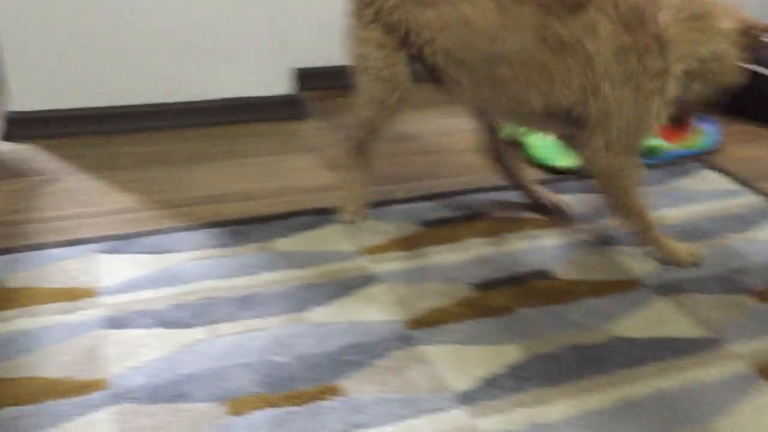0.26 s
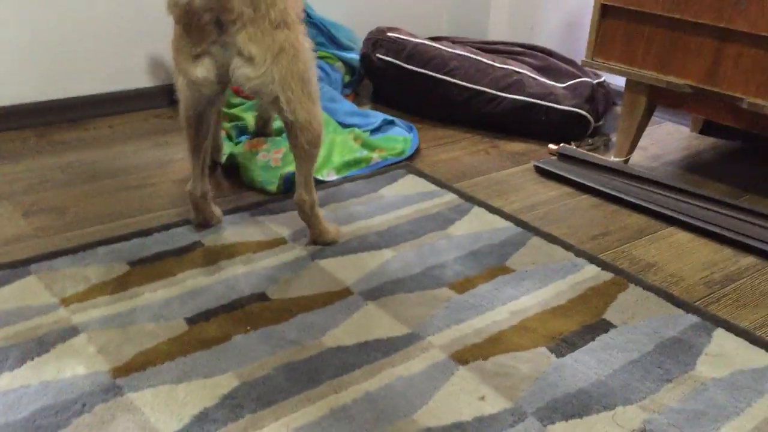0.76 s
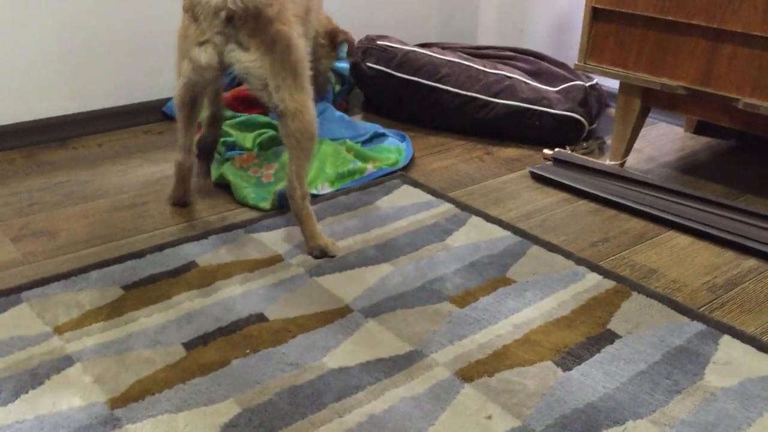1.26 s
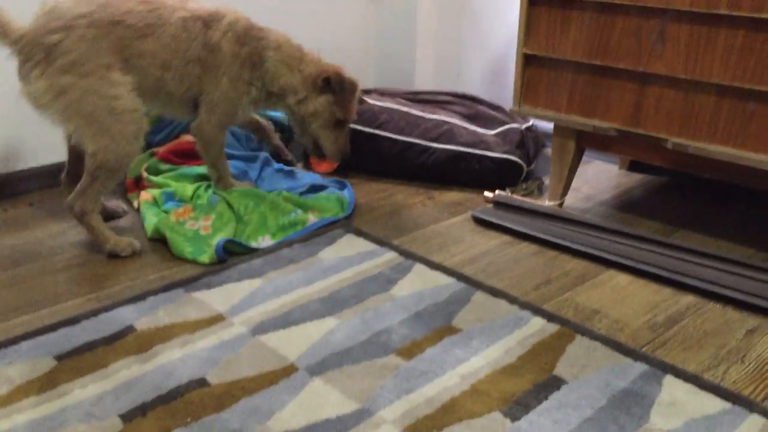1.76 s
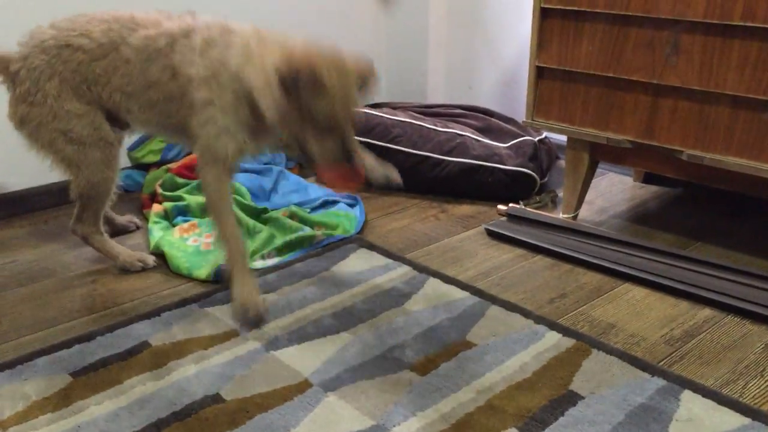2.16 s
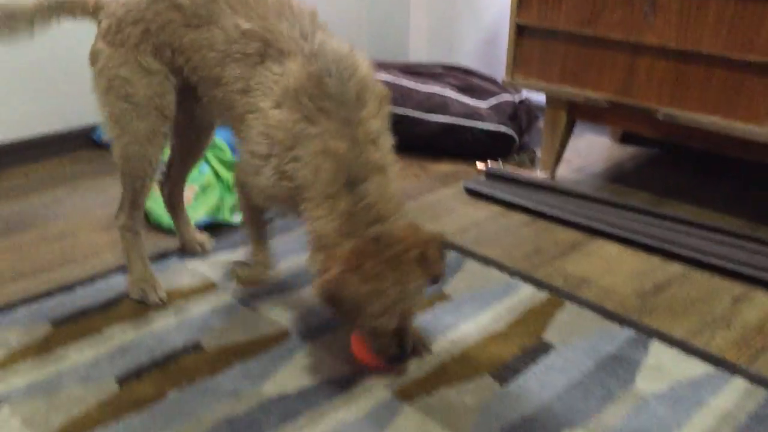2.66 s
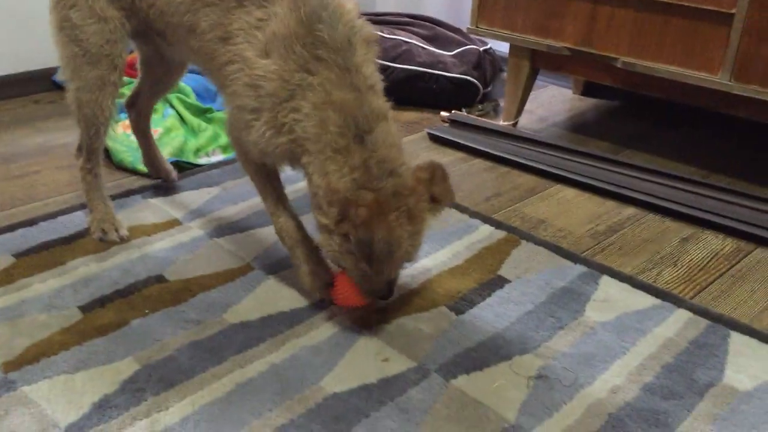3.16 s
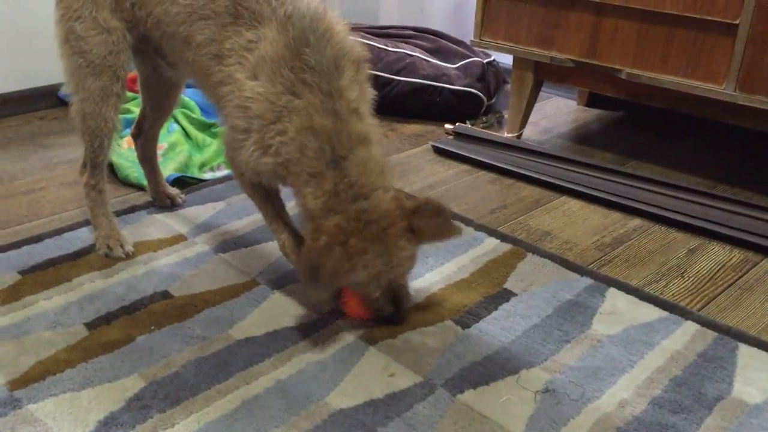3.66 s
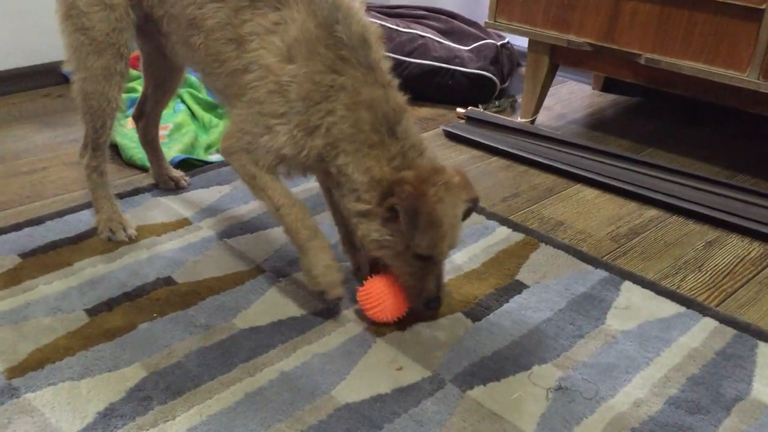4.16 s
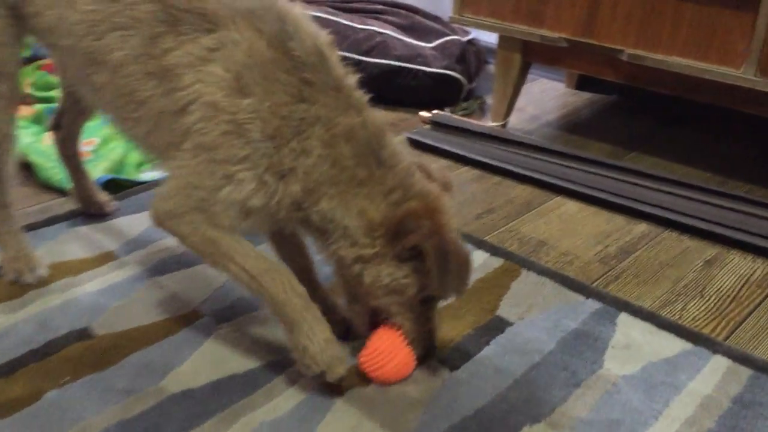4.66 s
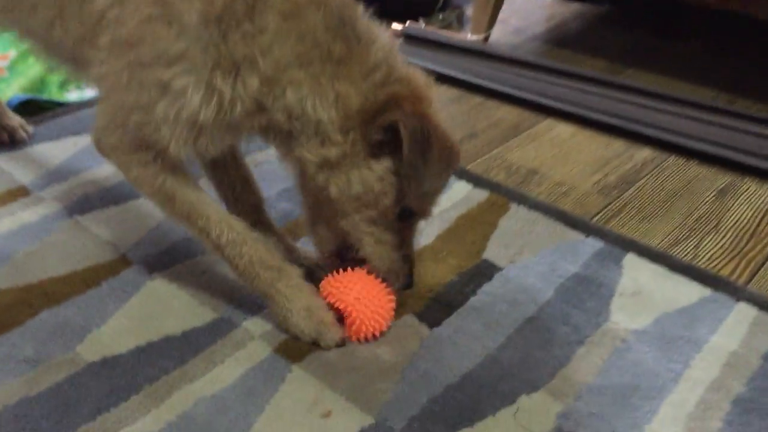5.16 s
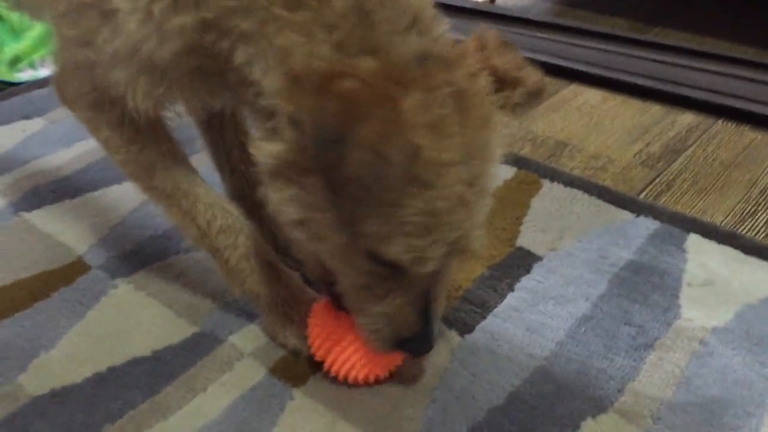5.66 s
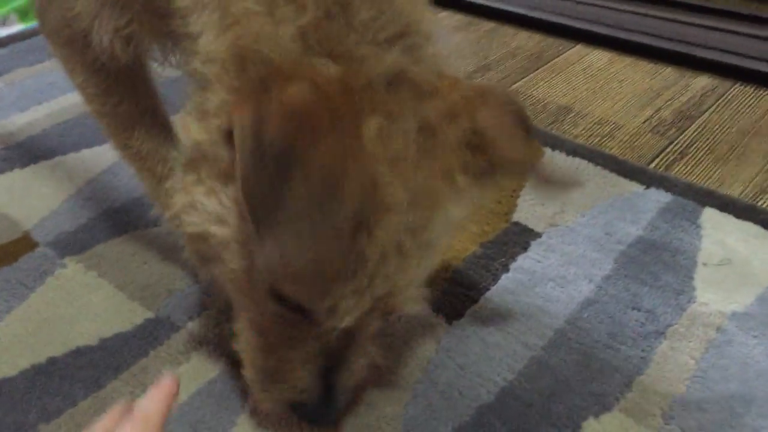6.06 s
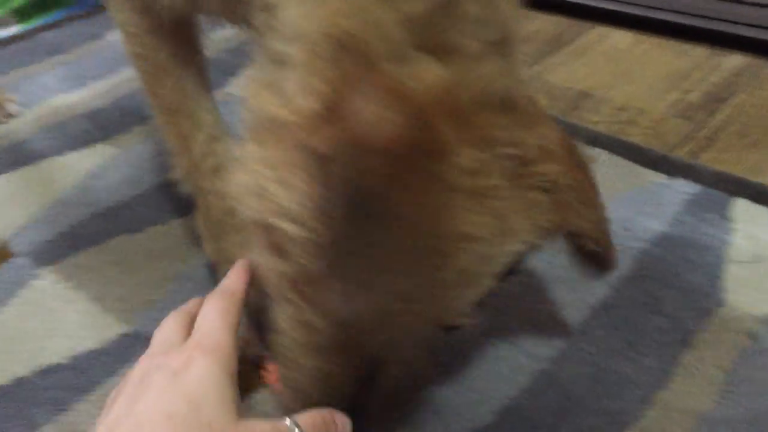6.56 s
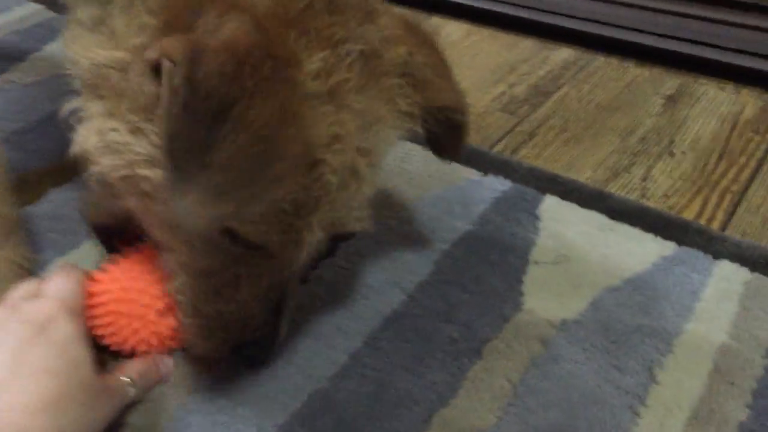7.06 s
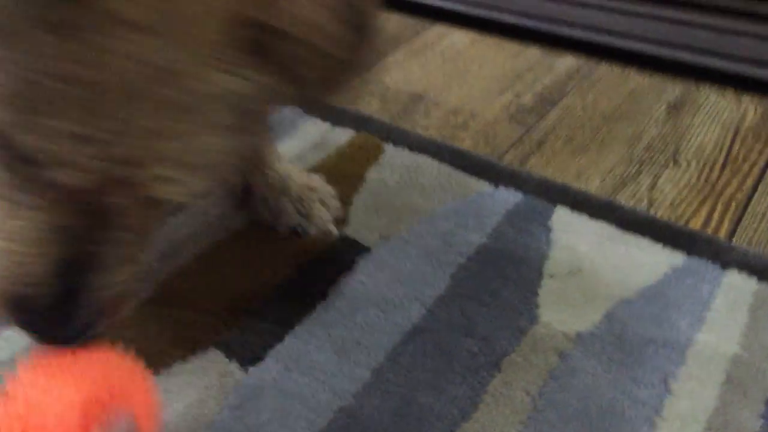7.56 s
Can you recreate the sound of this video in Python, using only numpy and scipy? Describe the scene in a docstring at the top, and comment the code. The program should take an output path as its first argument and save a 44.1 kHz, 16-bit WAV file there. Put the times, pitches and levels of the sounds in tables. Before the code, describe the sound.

A dog plays with a hollow rubber squeaky ball in a small, lively room. Brief, bright reedy squeaks come one per bite, with a sharp squeal early on, sparser chirps, then a dense run of chewing. After a near pause, louder, closer squeaks return with a hard click and a second squeal. Soft paw thuds, dull jaw knocks and faint fur rustle sit over very quiet room noise.

```python
"""A spiky rubber ball squeaks as a dog chews it on a rug in a living room, first farther off, then close by.
Each bite drives air through the ball's reed: the squeak scoops up, usually sags as the ball empties, and drops
as the jaw lets go. A clamping jaw pushes the pitch up, as far as a squeal; weak air only hisses. Paws thud as
low booms, jaws knock on the hollow rubber, and uneven soft noises swell and fade near the dog. The small room
answers every sound of the dog with echoes, over a faint steady noise."""
import sys
import numpy as np
from scipy import signal
from scipy.fft import rfft, irfft
from scipy.io import wavfile
from scipy.ndimage import uniform_filter1d

SR = 44100
rng = np.random.default_rng(int(sys.argv[2]) if len(sys.argv) > 2 else 0)


def put_to_file(sound):
    """Save the sound as 16-bit audio at rate SR, in the file named by the first command-line argument."""
    columns = np.atleast_2d(sound).T  # one column per channel
    safe = np.clip(columns, -1, 1)
    whole_steps = np.round(safe * 32767)
    wavfile.write(sys.argv[1], SR, whole_steps.astype(np.int16))


N = 344862

# The tone colour of the quiet room. Each row: frequency in Hz, relative level per Hz in dB.
QUIET_ROOM_COLOUR = [(30, -9), (60, 6.5), (110, 0), (200, 1), (500, -7.5), (900, -12), (1400, -12),
                     (2000, -12), (4000, -19.5), (6500, -22), (15000, -25.5)]
# How the room echoes. Each row: frequency in Hz, time to fade by 60 dB in seconds, relative level in dB.
ROOM_BANDS = [(100, 0.65, 5.5), (440, 0.29, 0), (1080, 0.51, 9), (2200, 0.57, 4.5), (4060, 0.49, 8),
              (7400, 0.48, 5), (14000, 0.47, 1)]
# The dog comes nearer. Each row: time in seconds, room sound minus direct sound in dB.
ROOM_SHARE = [(0, -9.5), (.5, -9.5), (.9, -6.5), (1.6, -7), (2.3, -9), (2.7, -10), (3.5, -10), (4.2, -10),
              (4.9, -14), (6.2, -17.5), (6.7, -16), (7.8, -18)]
# Uneven soft noises near the dog swell and fade. Each row: start in seconds, length in seconds, level in dB.
SOFT_NOISES = [(1.95, 0.11, -66), (2.697, 0.11, -55.5), (7.498, 0.19, -54), (7.692, 0.09, -50.5)]
# The tone colour of the soft noises. Each row: frequency in Hz, relative level in dB.
SOFT_NOISE_COLOUR = [(150, -17), (330, -1.5), (550, -15), (850, -7), (1600, -5), (2400, -6), (3600, -25),
                     (6000, -16.5), (15000, -35)]
# Paws on floor and rug. Each row: start in seconds, level in dB, pitch in Hz,
# time to fade by 60 dB in seconds.
PAW_THUDS = [(.156, -38, 60.4, .19), (.371, -23, 73.5, 0.053), (.38, -42, 237, 0.11),
             (.43, -36.5, 59.6, 0.12), (.721, -37.5, 74, 0.092), (.795, -33, 136, 0.085),
             (1.247, -37, 225, 0.085), (1.868, -38.5, 162, 0.082), (2.29, -35.5, 60.7, .17),
             (2.358, -47, 60, .13), (2.66, -38.5, 84.8, .069), (5.825, -43.5, 102.5, 0.068),
             (6.491, -43, 167, 0.11), (6.887, -36.5, 122, 0.038), (7.035, -28.5, 146, .039),
             (7.34, -39.5, 67.3, 0.15), (7.78, -38.5, 202, 0.22)]
# Teeth and claws knock on ball and floor. Each row: time in seconds, level in dB, extra treble in dB.
KNOCKS = [(.795, -36, -4), (1.248, -48, 12.5), (1.867, -43.5, 24), (2.756, -52.5, 0.5), (2.979, -50, 13),
          (3.173, -53, -0.5), (3.269, -51.5, 6), (5.159, -50, 17.5), (5.192, -50, -1), (5.215, -47, -0.5),
          (5.404, -49.5, -0.5), (5.482, -50.5, 6.5), (5.493, -45, 9), (5.577, -54, -6.5), (5.81, -48, 1),
          (5.827, -48, 14.5), (5.863, -54.5, 4.5), (5.977, -42, 24.5), (6.477, -47, -8), (6.551, -24, 25),
          (6.614, -48, -7.5), (7.042, -48, -12), (7.235, -48.5, -5.5), (7.363, -51.5, 3),
          (7.553, -46.5, 8.5), (7.78, -44, -3.5), (7.799, -46, 8)]
# The ways the hollow ball rings. Each row: pitch in Hz, relative level in dB,
# time to fade by 60 dB in seconds.
BALL_MODES = [(191, -0.5, 0.15), (296.2, 5, .07), (382.3, -3, 0.1), (551, -1.5, 0.059), (786, 1.5, 0.039),
              (1110, -5, 0.062)]
# Air too weak to make the reed beat. Each row: start in seconds, length in seconds, level in dB.
PUFFS = [(1.356, 0.01, -44), (1.98, 0.039, -58), (2.716, 0.027, -62), (3.195, .14, -75),
         (5.187, 0.039, -63.5), (5.296, 0.041, -66.5), (5.443, 0.043, -52.5), (5.686, 0.11, -66),
         (5.984, 0.027, -56.5), (7.056, 0.021, -44.5), (7.242, .065, -45.5), (7.363, 0.031, -45),
         (7.461, 0.052, -48)]
# The tone colour of air hissing through the reed. Each row: frequency in Hz, relative level in dB.
HISS_COLOUR = [(1000, -13.5), (3800, -25), (5200, -11), (6300, -0.5), (7000, 0), (7800, -14), (9200, -7.5),
               (10300, -15.5), (12000, -14), (15000, -17)]
# The reed barely swings and hums. Each row: start in seconds, length in seconds, level in dB, pitch in Hz.
HUMS = [(0.123, 0.058, -52.5, 793), (1.262, 0.022, -46.5, 895), (3.041, 0.035, -55.5, 806),
        (7.255, 0.039, -52.5, 855), (7.374, 0.013, -54.5, 798)]
# The reed in its short pipe favours some frequencies. Each row: frequency in Hz, relative level in dB.
PIPE_COLOUR = [(700, 13), (1000, -5), (2000, 0), (2950, -12.5), (3900, -21.5), (4700, -20.5), (5600, -16),
               (6500, -10), (7600, -15.5), (8700, -14.5), (10300, -24.5), (11500, -25), (14500, -22.5),
               (16000, -29.5)]
# A hard squeeze makes the reed beat unevenly, until it overblows into a whistle.
# Each row: pitch in Hz, strain from 0 to 1.
STRAIN_BY_PITCH = [(950, .04), (1100, .16), (1500, .55), (2500, .9), (4000, .4)]
# One squeak a bite. Each row: start in seconds, length in seconds, rise in seconds,
# pitch in Hz before the bends, sag in Hz per second, level in dB before the swells, brightness in dB,
# then the colour from the muzzle: dB at 2 kHz, at 3 kHz, at 4 kHz, and from 8 kHz up.
BITES = [ (-.01, 0.061, .005, 1032, 400, -31, -5, -15, 19, 13, -6.5),
         (0.224, .1, 0.00091, 1033, 95, -32.5, -4, -5.5, 10, 18.5, -3.5),
         (.393, 0.05, 0.0026, 1021, 1897, -32.5, -10.5, 1, 16.5, 7, -3.5),
         (0.511, 0.041, 0.0011, 963, 169, -35, -14, -2, 9.5, 2.5, 3),
         (0.681, 0.042, 0.0011, 988, -250, -32.5, -7.5, -1.5, 5.5, 12, 6.5),
         (0.931, .115, 0.0022, 1131, 1395.5, -31.5, -4.5, -1, 6, 15.5, 3),
         (1.155, 0.063, 0.00088, 991, -300, -36, -8, 4, 14, 18.5, 3.5),
         (1.227, 0.032, 0.0023, 996, 2, -38.5, -2.5, 3, 6, 11, 0),
         (1.4, 0.01, 0.0014, 1006, -5, -39, -8.5, -2.5, 0, 6, 0),
         (1.623, 0.076, 0.0022, 1014, 182, -38.5, -7.5, -0.5, -0.5, 4, -2),
         (2.125, 0.014, 0.0021, 915, -0.5, -38.5, -11.5, 2, 4, -3, -1),
         (2.203, 0.05, 0.0014, 963, 425, -35, -5, 4, 2, 4, 4),
         (2.416, .011, 0.0017, 899, 0, -47, -10, 13.5, 10, -8, 1.5),
         (2.574, .11, 0.00071, 970, 734, -36.5, -3, 0, 5.5, 7, -1.5),
         (3.386, 0.09, 0.00092, 1016, 657, -30, -20.5, -3.5, -1.5, -4.5, -3.5),
         (3.495, 0.084, .003, 1155, 1850, -28, -12, 0.5, -0.5, 5, -12),
         (3.684, .054, 0.013, 1110, 1940, -29, -21.5, -2.5, -4, -5, -3),
         (3.785, 0.17, 0.0066, 1103, 505, -28.5, -11, 1, 5.5, 4, -12.5),
         (4.023, 0.053, 0.00059, 1023, 1329, -28, -21, -1, -3, -7, -2),
         (4.218, 0.073, 0.0076, 1064, 1030, -28, -13.5, -2, -4, -6.5, 12.5),
         (4.412, 0.12, 0.0031, 1027, 820, -29, -8, -3.5, -7, -8, 11.5),
         (4.645, 0.11, 0.0045, 1145, 1206, -26.5, -11.5, 2, 0, -0.5, 0.5),
         (4.807, 0.14, 0.0011, 984, 83, -29, -16.5, -3, -4, -4.5, 10.5),
         (6.013, 0.1087, 0.023, 1038, 1114, -26.5, -7.5, 1, -6, -5, -5.5),
         (6.166, 0.16, 0.0057, 1104, 479, -24.5, 5.5, -10, -2.5, 3.5, -11),
         (6.451, 0.081, 0.00071, 969, -3, -27.5, -8.5, -3.5, 0.5, -1.5, -4),
         (6.763, 0.099, 0.002, 1009, 450, -24.5, -12, -12, 2.5, -9, -4),
         (6.972, 0.048, 0.0078, 1021, 3091, -26.5, -7.5, -19.5, 4.5, -9, -0.5),
         (7.641, 0.053, 0.0028, 951, 1250, -25, -7, 11, 11.5, 6.5, -3.5)]
# The jaw clamps down within a bite. Each row: time in seconds, half width in seconds,
# pitch rise in Hz, level rise in dB.
CLAMPS = [(.002, 0.023, 548, 12), (.2386, 0.031, 214.7, 11.5), (3.801, 0.03, 244.6, 3),
          (4.713, 0.012, 45.2, 5), (6.202, .042, 536.6, 9), (6.781, 0.019, 30.3, 0.5)]
# Twice the ball is crushed flat and the reed overblows; each squeal is a list of points.
# Each row of a list: time in seconds, reed pitch in Hz, level in dB.
SQUEALS = [
    [(.768, 1109, -25.5), (.793, 1385, -21), (.809, 1928, -28), (.823, 2760, -16), (.847, 3946, -27.5),
     (.886, 4186, -33.5), (.896, 3415, -26.5), (.9, 2843, -14), (.911, 1670, -28.5), (.925, 1226, -38)],
    [(6.564, 1365, -20), (6.576, 1534, -19.5), (6.6, 1550, -25), (6.612, 2080, -18), (6.624, 2620, -21.5),
     (6.63, 2140, -29)],
]
# The colour of each squeal. Each row: brightness in dB, then dB at 2 kHz, at 3 kHz, at 4 kHz,
# and from 8 kHz up.
SQUEAL_COLOURS = [(-4.5, -1, 13.5, 15, -5), (-3.5, -6, 6.1, 3.3, -13.5)]

# level of the quiet room, and the highest frequency let through
QUIET_ROOM_DB, TOP_HZ = -69, 15600
# the dog stands over the ball and gnaws it
GNAW_START_S, GNAW_END_S = 3.6, 6.8
# the jaws meet the ball just before each squeak; their level is relative to the squeak
JAW_LEAD_S, JAW_DB, JAW_TREBLE_DB = 0.014, -27, 5
# pitch scatter (as a share) and level scatter at full strain; the jaw's tremble as a share of the pitch
RASP_JITTER, RASP_DB, TREMOR = .011, 3, .005
# shares of the pitch by which a squeak starts flat and ends flat, and the time the jaw takes to let go
SCOOP, DROP, LET_GO_S = 0.068, .07, .0024
# a slow bite starts flatter still, and lets go more slowly by a share of its rise
SCOOP_PER_RISE_S, LET_GO_SHARE = 8, 0.41
# a bite with this rise swells in from so many dB below; quick ones start near full strength
SLOW_RISE_S, SWELL_DB = 0.02, 15.5
# as the pressure falls, the squeak gets softer and duller with its pitch
LEVEL_DB_PER_OCTAVE, BRIGHT_DB_PER_OCTAVE = 38, 9.5
CLAMP_FLATNESS = 2.4  # 2 is a bell shape; more holds the top longer


def undb(db):
    """Turn decibels into a gain."""
    return 10 ** (np.asarray(db) / 20)


def unit(x):
    """Scale a sound to an average (rms) strength of 1."""
    return x / np.sqrt(np.mean(x ** 2) + 1e-18)


def lookup(hz, points):
    """Read a value between (Hz, value) points, with frequency on a log scale."""
    point_hz, value = np.transpose(points)
    return np.interp(np.log(np.maximum(hz, 1)), np.log(point_hz), value)


def noise(size, colour):
    """Make noise of rms 1 with the given (Hz, dB) colour."""
    hz = np.fft.rfftfreq(size, 1 / SR)
    white = rfft(rng.standard_normal(size))
    return unit(irfft(white * undb(lookup(hz, colour)), size))


def wander(t, rate):
    """Drift between random values, with `rate` new values a second and a spread near 1."""
    knots = rng.standard_normal(int(t[-1] * rate) + 2)
    return np.interp(t * rate, np.arange(len(knots)), knots)


def clock(length):
    """List the sample times of a short sound."""
    return np.arange(max(int(length * SR), 2)) / SR


def decay(t, t60):
    """Fade by 60 dB in t60 seconds."""
    return np.exp(-np.log(1000) * t / t60)


def gate(t, length, edge):
    """Swell up from 0, and fade from `length` on, over rounded edges."""
    nearest_end = np.minimum(t, length + edge - t)
    return np.sin(np.pi / 2 * np.clip(nearest_end / edge, 0, 1)) ** 2


def rounded(t, s, values, span):
    """Draw a curve through the points, its corners rounded by the give of the rubber."""
    curve = np.interp(t, s, values)
    return uniform_filter1d(curve, max(int(span * SR), 1), mode="nearest")


def add(track, start, sound):
    """Mix a sound into the track at a time in seconds, leaving out what falls outside."""
    i = int(start * SR)
    sound, i = sound[max(-i, 0):], max(i, 0)
    track[i:i + len(sound)] += sound[:max(N - i, 0)]


def quiet_room(t):
    """The room's own faint noise, whose level drifts a little."""
    return noise(N, QUIET_ROOM_COLOUR) * undb(QUIET_ROOM_DB + 0.42 * wander(t, 4.4))


def room(x, first=0.0065, early_db=4, early_t60=0.11, dense=.06):
    """Floor and furniture answer with single echoes, which crowd into a tail; each band fades at its own rate."""
    t = clock(.8)
    hz = np.fft.rfftfreq(len(t), 1 / SR)
    centres, t60s, colours = np.transpose(ROOM_BANDS)
    # echoes grow in number with the square of the time, between a floor and a ceiling
    density = np.clip(.1 * (t / dense) ** 2, .02, 1)
    signs = np.sign(rng.standard_normal(len(t)))
    present = rng.random(len(t)) < density
    echoes = rfft(signs * present / np.sqrt(density))
    onset = (t > first) * (1 + undb(early_db) * decay(t, early_t60))
    response = 0
    for band, t60, db in zip(np.eye(len(ROOM_BANDS)), t60s, colours):
        shape = onset * decay(t, t60)
        weight = lookup(hz, np.column_stack([centres, band]))
        band_echoes = irfft(echoes * weight, len(t))
        response = response + undb(db) * band_echoes * shape / np.linalg.norm(shape)
    return signal.fftconvolve(x, response)[:N]


def soft_noises(grain_db=5.0):
    """An uneven soft noise that swells and fades."""
    out = np.zeros(N)
    for s, length, db in SOFT_NOISES:
        t = clock(length + .07)
        level = undb(db + grain_db * wander(t, 176))
        add(out, s - .035, noise(len(t), SOFT_NOISE_COLOUR) * gate(t, length, edge=0.08) * level)
    return out


def paws(rise=0.0037, scuff_db=-12, count=12, shift_db=-57, low_hz=55, high_hz=170, shift_t60=0.2):
    """Soft pads push the floor: a damped boom with a little scuff. The gnawing dog shifts its weight."""
    out, t = np.zeros(N), clock(.2)
    scuff_colour = [(25, -4), (60, -5), (250, -0.5), (600, -14.5), (3000, -32)]
    shifts = []
    for when, pitch in rng.random((count, 2)):
        start = np.interp(when, [0, 1], [GNAW_START_S, GNAW_END_S])
        shifts.append((start, shift_db, low_hz * (high_hz / low_hz) ** pitch, shift_t60))
    for s, db, hz, t60 in [*PAW_THUDS, *shifts]:
        boom = unit(np.sin(2 * np.pi * hz * t)) * decay(t, t60)
        scuff = noise(len(t), scuff_colour) * decay(t, t60)
        add(out, s, undb(db) * (boom + undb(scuff_db) * scuff) * (1 - np.exp(-t / rise)))
    return out


def knock(treble_db, tick_db=-8, tick_t60=0.03, rise=0.00025, rub_db=-12, rub_t60=0.42, tilt=0.94):
    """A tooth slips on the rubber: a tick, a rub, and dull ringing whose pitches shift as the ball is squashed."""
    t = clock(.3)
    hz, db, t60 = np.transpose(BALL_MODES)[:, :, None]
    level_chance, pitch_chance = rng.standard_normal((2, len(BALL_MODES), 1))
    # harder contact favours the higher modes
    size = undb(db + tilt * treble_db * np.log2(hz / hz[0]) + 2 * level_chance)
    modes = np.sin(2 * np.pi * hz * (1 + 0.091 * pitch_chance) * t) * decay(t, t60)
    body = (size * modes).sum(0) / np.linalg.norm(size)
    tick_colour = [(300, -9), (1000, -25.5), (2400, -1), (4000, -25.0), (7000, -16), (15000, -40)]
    tick = noise(len(t), tick_colour) * decay(t, tick_t60)
    rub_colour = [(100, -5.5), (330, 2.5), (550, -6.5), (1000, -2.5), (1600, -16.5), (5000, -29.0)]
    rub = noise(len(t), rub_colour) * decay(t, rub_t60)
    hard = undb(tick_db + treble_db)
    mix = 2.76 * body + hard * tick + undb(rub_db) * rub
    return mix * (1 - np.exp(-t / rise)) / np.hypot(1, hard)


def chewing(count=12, faint_db=-58, spread_db=6):
    """Clear knocks, the jaws closing before each squeak, and faint gnawing at random moments."""
    out = np.zeros(N)
    for s, db, treble_db in KNOCKS:
        add(out, s - .002, undb(db) * knock(treble_db))
    for s, length, rise, hz, sag, db, *colour in BITES:
        add(out, s - JAW_LEAD_S, undb(db + JAW_DB) * knock(JAW_TREBLE_DB))
    for when, size, treble in rng.random((count, 3)):
        start = np.interp(when, [0, 1], [GNAW_START_S, GNAW_END_S])
        add(out, start, undb(faint_db + spread_db * size) * knock(4 * treble))
    return out


def puffs():
    """Air too weak to make the reed beat only hisses through it."""
    out = np.zeros(N)
    for s, length, db in PUFFS:
        t = clock(length + 0.0076)
        level = undb(db + 1.0 * wander(t, 88))
        add(out, s - .004, noise(len(t), HISS_COLOUR) * gate(t, length, edge=0.0061) * level)
    return out


def hums():
    """A reed that barely swings gives a nearly pure, slightly unsteady tone."""
    out = np.zeros(N)
    for s, length, db, hz in HUMS:
        t = clock(length + 0.013)
        unsteady_hz = hz * (1 + 0.0086 * wander(t, 80))
        tone = np.sin(2 * np.pi * np.cumsum(unsteady_hz) / SR)
        add(out, s - .005, unit(tone) * gate(t, length, edge=0.013) * undb(db))
    return out


def bite(start, length, rise, top_hz, sag, db, bright_db):
    """One bite as rows of seconds, Hz, dB, brightness dB: pressure builds, leaks away and is let go."""
    t = clock(length)
    building = np.exp(-t / rise)
    letting_go = np.exp((t - length) / (LET_GO_S + LET_GO_SHARE * rise))
    held_hz = (top_hz - sag * t) * (1 - DROP * letting_go)
    hz = held_hz * (1 - (SCOOP + SCOOP_PER_RISE_S * rise) * building)
    octaves = np.minimum(np.log2(held_hz / hz.max()), 0)  # how far the pitch has fallen
    swell = SWELL_DB * (building * rise / SLOW_RISE_S) ** 2
    db = db + LEVEL_DB_PER_OCTAVE * octaves - swell
    for s, width, more_hz, more_db in CLAMPS:
        clamp = np.exp(-np.abs((start + t - s) / width) ** CLAMP_FLATNESS)
        hz = hz + more_hz * clamp
        db = db + more_db * np.sqrt(clamp)
    return np.column_stack([start + t, hz, db, bright_db + BRIGHT_DB_PER_OCTAVE * octaves])


def harmonics(t, hz, bright_db, muzzle, sway_db=2.18):
    """Size the reed's harmonics after pipe and muzzle, rms 1 together; brightness is treble minus the rest."""
    k = np.arange(1, 19)[:, None]
    partial_hz = k * hz
    nasal, ring, edge, sheen = muzzle  # dB at 2, 3, 4 and from 8 kHz
    mouth = [(1400, 0), (2000, nasal), (2950, ring), (3900, edge), (5000, 0), (7200, 0), (8000, sheen)]
    # the head moves over the floor, so each harmonic swells and fades on its own, the high ones most
    sway = sway_db * np.log(1 + k) * np.array([wander(t, 45) for _ in k])
    size = undb(lookup(partial_hz, PIPE_COLOUR) + lookup(partial_hz, mouth) + sway)
    size = size * (partial_hz < SR * .4)  # leave out what is too high to represent safely
    # a sharper closure of the reed lifts the upper harmonics, above about 4.5 kHz
    upper = np.clip((partial_hz - 4200) / 600, 0, 1)
    low_power = (size ** 2 * (1 - upper)).sum(0)
    high_power = (size ** 2 * upper).sum(0)
    balance = np.sqrt(low_power / high_power)
    size = size * (1 - upper + upper * balance * undb(bright_db))
    return k, size / np.sqrt((size ** 2).sum(0) / 2)


def squeak(curve, muzzle, attack=0.0021, release=0.0043, slack=.08, twist=2.1, air_db=-26, waver_db=1):
    """The reed beats once a cycle; its harmonics slide through the pipe's resonances."""
    s, *columns = np.transpose(curve)
    margin = .025  # seconds before and after the curve
    start = s[0] - margin
    t = clock(s[-1] + margin - start)
    hz, db, bright_db = (rounded(t + start, s, column, span=.004) for column in columns)
    strain = lookup(hz, STRAIN_BY_PITCH)
    # while the reed's swing builds up and dies away, it is flatter and duller
    before = np.maximum(margin - t, 0) / attack
    after = np.maximum(t + start - s[-1], 0) / release
    swing = 1 / (1 + (before + after) ** 2)
    hz = hz * (1 - slack * (1 - swing)) * (1 + TREMOR * wander(t, 70))
    k, size = harmonics(t, hz, bright_db + 10 * np.log10(swing), muzzle)
    # under strain the cycles differ in length and strength
    jitter = strain * wander(t, 900)
    flutter = strain * wander(t, 1400)
    phase = 2 * np.pi * np.cumsum(hz * (1 + RASP_JITTER * jitter)) / SR
    # the twist staggers the harmonics so that their peaks do not pile up
    tone = (size * np.cos(k * phase + twist * k * np.log(k))).sum(0)
    # air rushes through while the reed stands open
    air = undb(air_db) * strain * noise(len(t), HISS_COLOUR) * (1 + np.cos(phase))
    level = undb(db + RASP_DB * flutter + waver_db * wander(t, 80))
    return start, (tone + air) * swing * level


def squeaker():
    """The ball's reed: a squeak for every bite, two squeals, and the hiss and hum of gentler squeezes."""
    out = puffs() + hums()
    for *squeeze, nasal, ring, edge, sheen in BITES:
        add(out, *squeak(bite(*squeeze), (nasal, ring, edge, sheen)))
    for points, (bright_db, *muzzle) in zip(SQUEALS, SQUEAL_COLOURS):
        curve = [(*point, bright_db) for point in points]
        add(out, *squeak(curve, muzzle))
    return out


def scene():
    """Everything but the faint noise happens at the dog, so one distance sets the share of the room."""
    t = np.arange(N) / SR
    dog = soft_noises() + paws() + chewing() + squeaker()
    wet = undb(np.interp(t, *np.transpose(ROOM_SHARE)))
    direct = dog / np.hypot(1, wet)  # more room means less direct sound
    return (quiet_room(t) + room(direct * wet) + direct)[None]


def record(dry):
    """The phone's microphone cuts the deepest rumble and the top."""
    low_cut = signal.butter(3, 40, "high", fs=SR, output="sos")
    top_cut = signal.ellip(10, .2, 70, TOP_HZ, fs=SR, output="sos")
    return signal.sosfilt(top_cut, signal.sosfilt(low_cut, dry))


dry = scene()
out = record(dry)
put_to_file(out)
```